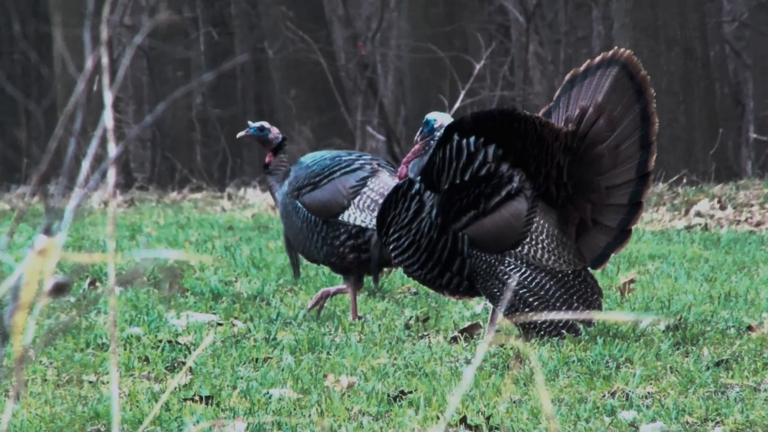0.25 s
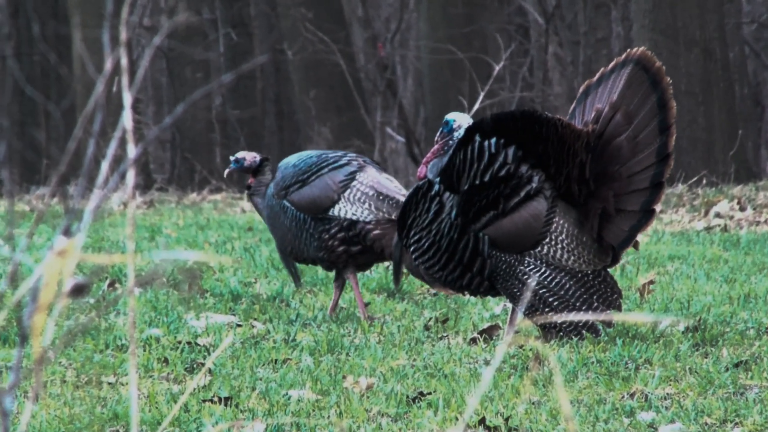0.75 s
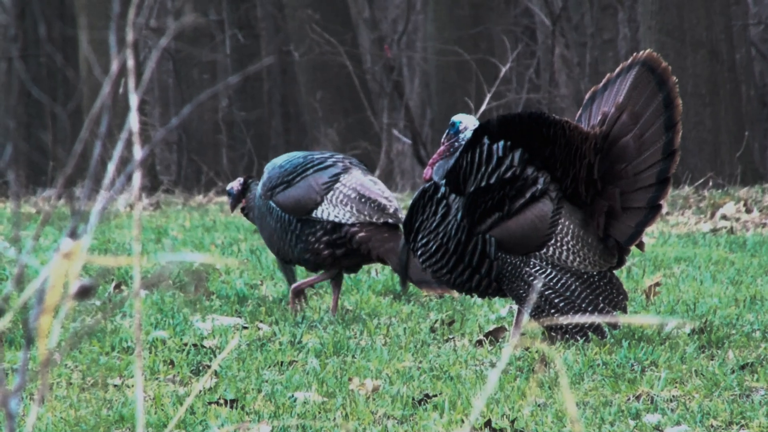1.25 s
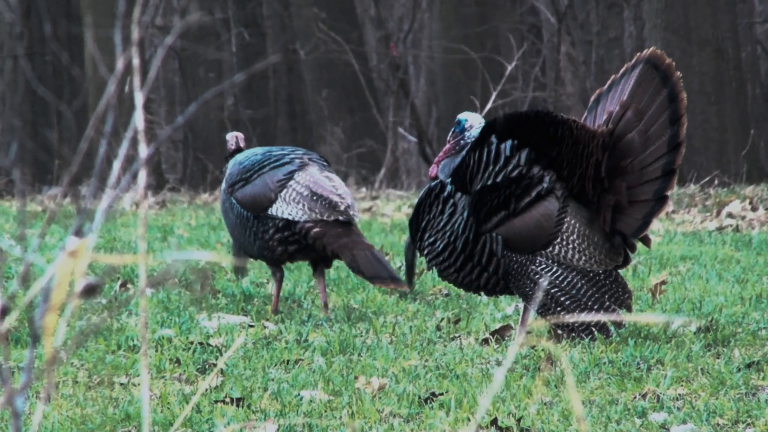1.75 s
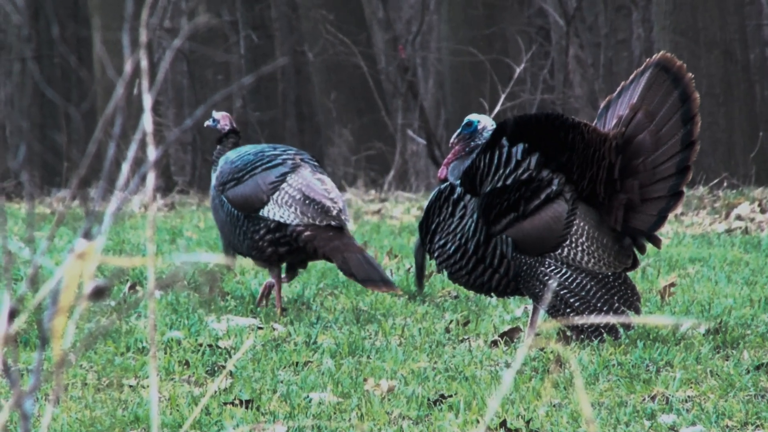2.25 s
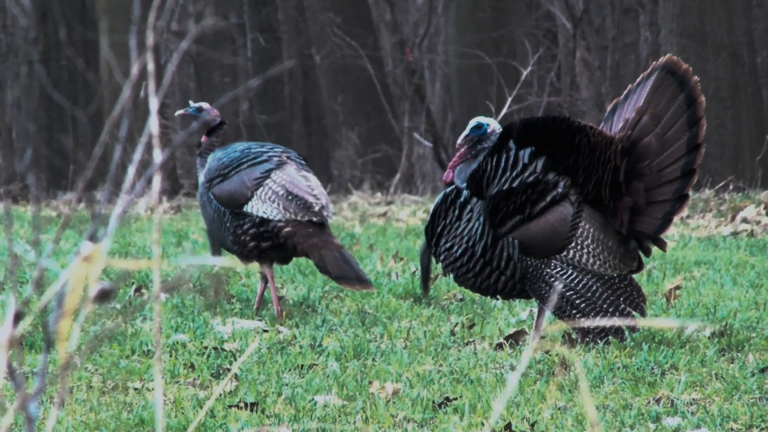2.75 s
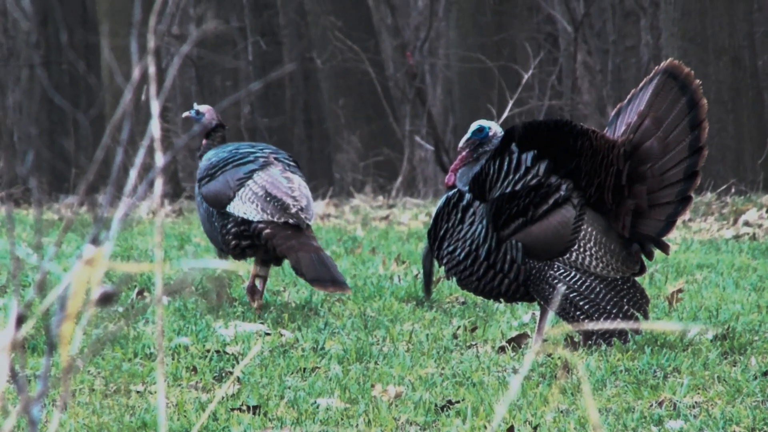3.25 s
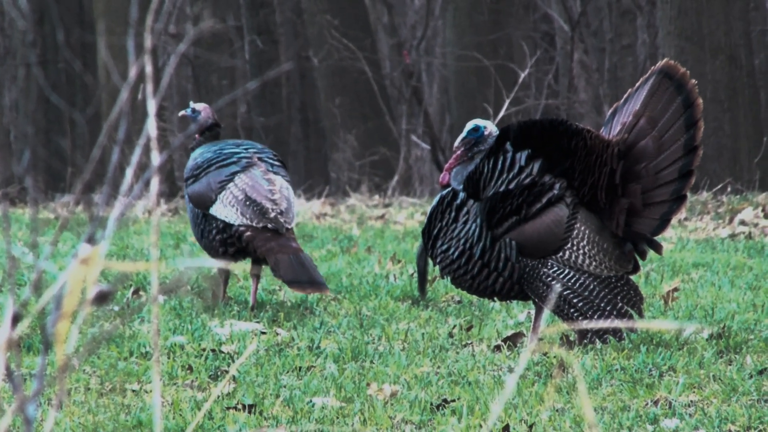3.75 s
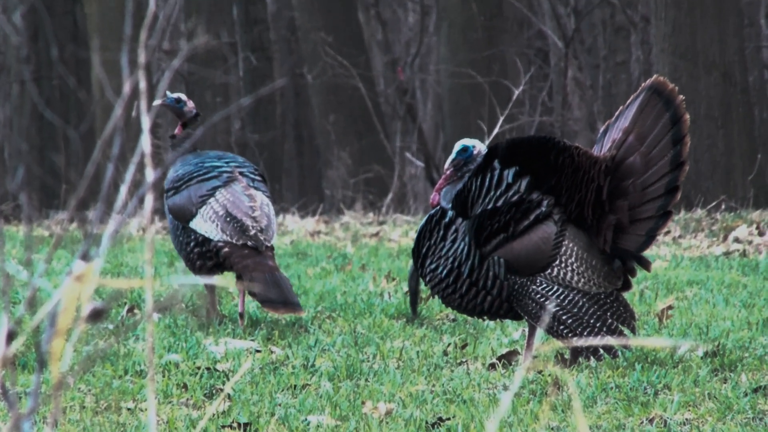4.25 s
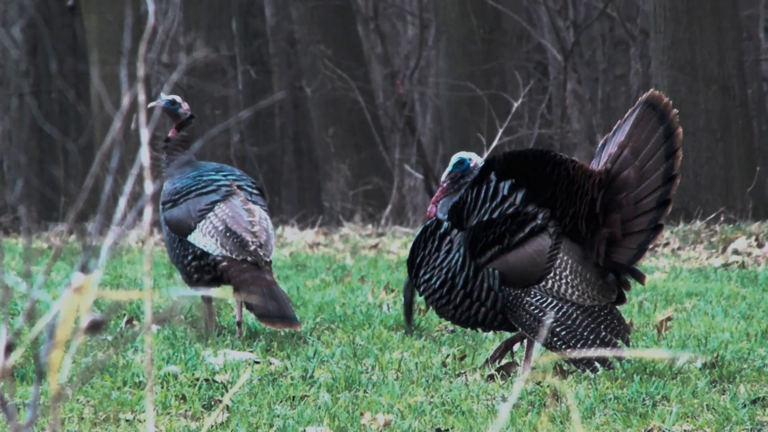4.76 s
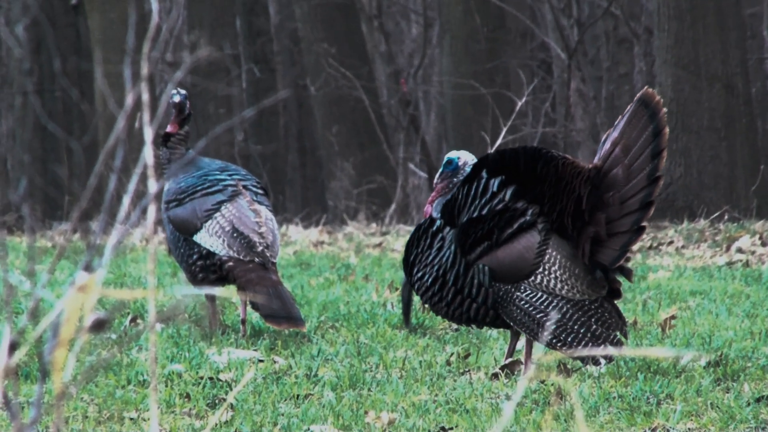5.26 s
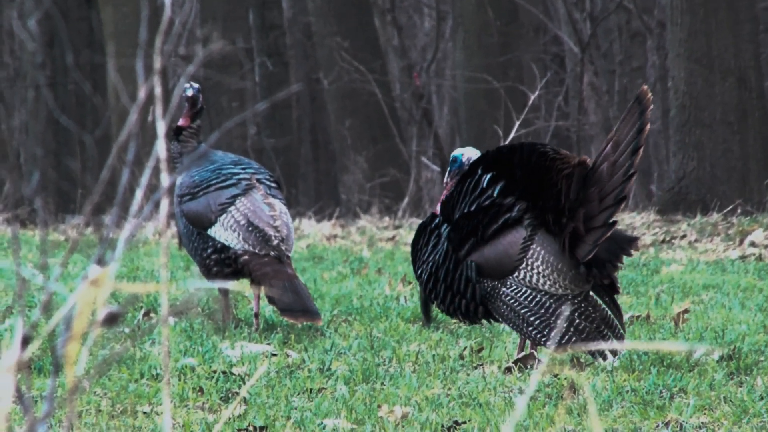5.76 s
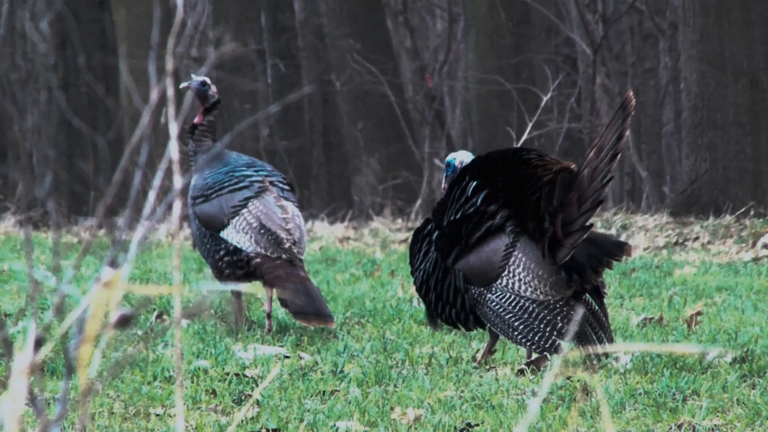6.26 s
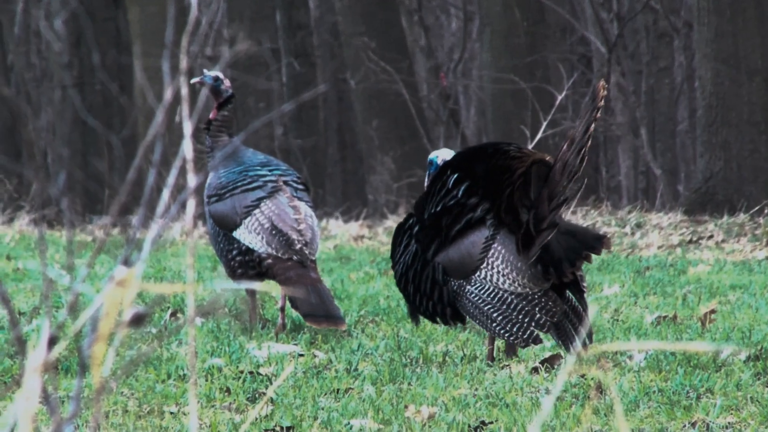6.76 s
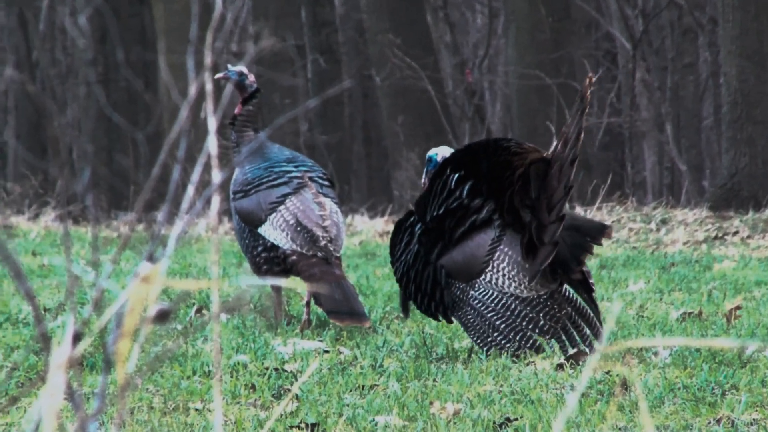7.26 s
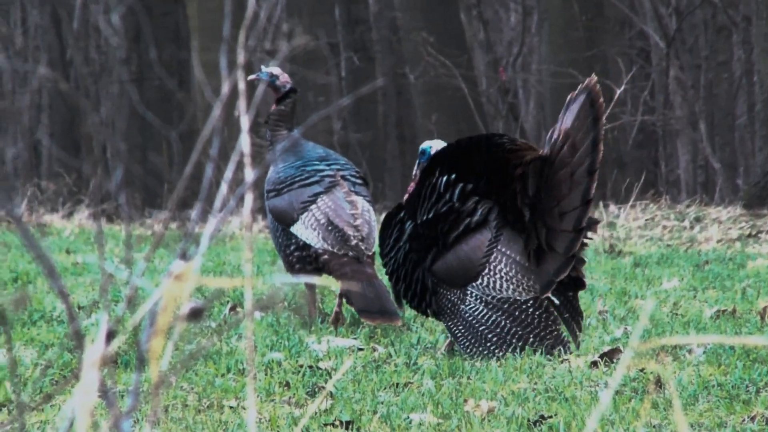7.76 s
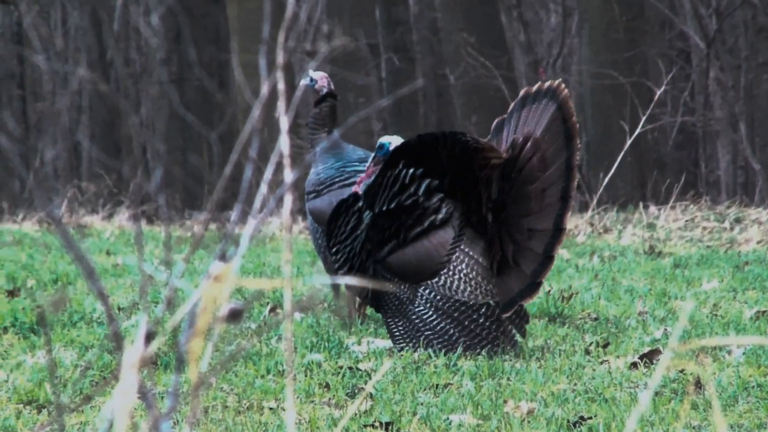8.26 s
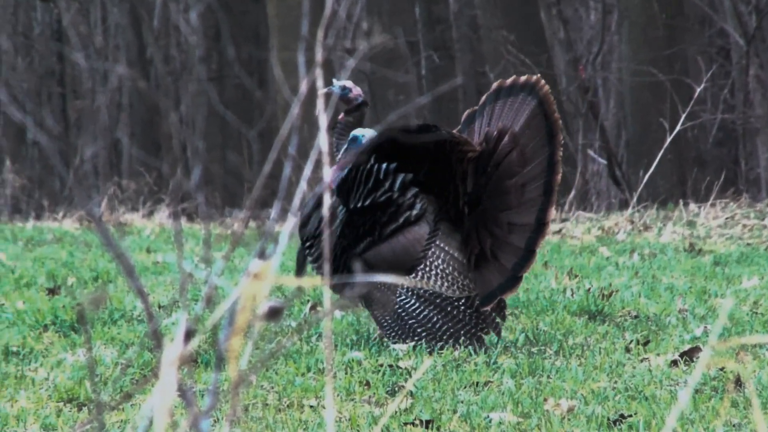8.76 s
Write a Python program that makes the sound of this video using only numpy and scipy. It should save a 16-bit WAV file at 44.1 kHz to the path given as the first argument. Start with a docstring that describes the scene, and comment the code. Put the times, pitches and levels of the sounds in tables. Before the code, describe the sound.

At a field edge beside woods, a hen turkey makes two soft peeps, then a long run of fifteen hoarse yelps, starting quietly, swelling and settling into a steady rhythm. Each flicks upward at its end and leaves a faint echo among the trees. After the last, only quiet air, a low wavering hum, small dull taps and a far songbird remain. Wide stereo, with the calls close on the left and the hum and taps on the right.

```python
"""At the edge of a field a hen turkey calls: two soft peeps, then fifteen raspy yelps that swell and even out.
Each yelp is a pulse train through moving resonances: a thin whistle, a break into rasp, an upward flick.
The woods answer faintly with slowly rising, decaying noise; a far songbird is a few gliding sine tones.
Two spaced microphones: the left faces the caller, the right favours a far hum (wavering harmonics),
a gusting breeze (coloured noise) and soft taps (decaying modes)."""
import sys
import numpy as np
from scipy import signal
from scipy.fft import rfft, irfft, next_fast_len
from scipy.io import wavfile
from scipy.ndimage import uniform_filter1d

SR = 44100
rng = np.random.default_rng(int(sys.argv[2]) if len(sys.argv) > 2 else 0)


def unload_wav(signal):
    """Save mono or channel-first audio to the path in sys.argv[1] as 16-bit WAV at rate SR, clipped to [-1, 1]."""
    wavfile.write(
        sys.argv[1],
        SR,
        np.round(np.clip(np.atleast_2d(signal).T, -1, 1) * 32767).astype(np.int16),
    )


N = 396635  # samples
EDGE_HZ = 15700  # upper band limit
TAUT_HZ = 813.2  # pitch at which the tension of the voice counts as 1


def amp(db):
    """Level to amplitude ratio: 20 dB is a factor of ten."""
    return 10 ** (np.asarray(db) / 20)


def evened(x):
    """Normalisation to unit RMS."""
    return x / np.sqrt(np.mean(x ** 2) + 1e-20)


def read(points, hz):
    """A spectrum's value by linear interpolation on a logarithmic frequency axis."""
    f, value = np.transpose(points)
    return np.interp(np.log(hz + 1), np.log(f + 1), value)


def add(mix, s, sound):
    """Superposition: a sound is summed into the mix from time s."""
    part = mix[max(round(s * SR), 0):][:len(sound)]
    part += sound[:len(part)]


def bump(x, at, width):
    """A Gaussian bell of height 1; width is its 1/e half width."""
    return np.exp(-((x - at) / width) ** 2)


def ramp(u, start):
    """Zero until start, then linear up to 1 at u = 1."""
    return np.maximum(u - start, 0) / max(1 - start, .01)


def wander(size, hz):
    """Low-pass noise of about unit RMS, rolling off above hz."""
    span = next_fast_len(size)
    f = np.fft.rfftfreq(span, 1 / SR)
    spectrum = rfft(rng.standard_normal(span)) / (1 + (f / hz) ** 4)
    return evened(irfft(spectrum, span))[:size]


def colour(x, points, size=4096):
    """Minimum-phase filter: the Hilbert transform of the log gain supplies the causal phase."""
    log_gain = np.log(amp(read(points, abs(np.fft.fftfreq(size, 1 / SR)))))
    response = np.fft.ifft(np.exp(np.conj(signal.hilbert(log_gain)))).real
    return signal.oaconvolve(x, response[:size // 2])[:len(x)]


def resonate(x, hz, width):
    """A moving resonance: shift the curve hz to zero, low-pass by one pole, shift back."""
    turn = np.exp(2j * np.pi * np.cumsum(hz) / SR)
    r = np.exp(-np.pi * width / SR)
    return 2 * (turn * signal.lfilter([1 - r], [1, -r], x / turn)).real


def brush(x, t60):
    """Early scattering from ground and nearby stems: a decaying noise response of unit energy."""
    t = np.arange(SR // 8) / SR
    response = rng.standard_normal(len(t)) * amp(-60 * t / t60) * (t > .001)
    return signal.oaconvolve(x, response / np.linalg.norm(response))[:N]


def woods(x, rise_s=0.21):
    """Multiple scattering among trunks: a slowly rising tail with frequency-dependent decay."""
    # spectrum of the answer: hz, gain_db
    answer_colour = [(300, -24.5), (800, 3), (1600, 3), (2900, -6), (3300, -12), (3700, -13.5), (5800, -7),
                     (12000, -21.5)]
    # reverberation time: hz, t60_s
    answer_t60 = [(300, 0.74), (1600, 0.78), (3000, 1.3), (6000, 0.11), (12000, 0.45)]
    hz, t, z = signal.stft(rng.standard_normal(int(1.5 * SR)), SR, nperseg=256)
    decay = amp(-60 * t / read(answer_t60, hz)[:, None])
    z = z * decay * (1 - np.exp(-t / rise_s))
    tail = evened(signal.istft(z, SR, nperseg=256)[1])
    return colour(signal.fftconvolve(x, tail / np.linalg.norm(tail))[:N], answer_colour)


def field():
    """Broadband noise: steady air, and a breeze whose amplitude is modulated by gusts."""
    # spectrum of the still air, relative: hz, density_db (per Hz)
    air_colour = [(20, -19), (76, -1), (110, -6.5), (185, -16), (260, -17), (400, -25), (1000, -28),
                  (1500, -34), (10000, -42), (15500, -46.5)]
    # balance of the air, left minus right: hz, difference_db
    air_side = [(25, -14.5), (60, -27.5), (200, -23), (400, -18.5), (1300, -5), (2400, -4), (4400, -10),
                (15000, -10.5)]
    # spectrum of the breeze, relative: hz, level_db
    breeze_colour = [(100, -23.5), (300, -1.5), (600, 0.5), (1000, -5.5), (1600, -13.5), (3000, -24.5),
                     (12000, -29.5)]
    # gusts in the grass, added to the breeze before the side gains: peak_s, half_width_s, level_db
    gusts = [(1.7, .35, -67), (5.522, .24, -61.5), (7.95, .27, -66.5), (8.98, .12, -68.5)]
    air_db, breeze_db = -60.5, -74.5  # before the side gains; breeze between gusts
    span = next_fast_len(N)
    t, hz = np.arange(N) / SR, np.fft.rfftfreq(span, 1 / SR)
    lean = amp(read(air_side, hz))
    sides = 2 * np.array([lean, np.ones(len(hz))]) / np.sqrt(1 + lean ** 2)
    air = [evened(colour(rng.standard_normal(N), air_colour, size=16384)) for _ in sides]
    air = amp(air_db) * irfft(rfft(air, span) * sides, span)[:, :N]
    breeze = np.array([evened(colour(rng.standard_normal(N), breeze_colour)) for _ in sides])
    strength = amp(breeze_db) + sum(amp(db) * bump(t, s, width) for s, width, db in gusts)
    return air + breeze * strength * amp([[-6], [5]])  # left, right dB


def hum(flicker_db=3, fourth_db=-5):
    """A harmonic series: lines 2, 3 and 4 share a wavering pitch; 2 and 3 flicker and swell."""
    # swells of single lines, before flicker and side gains: multiple, peak_s, half_width_s, level_db
    swells = [(3, .65, 0.44, -63), (3, 2.12, 0.16, -58), (2, 2.6, .2, -66.5), (2, 4.9, 0.25, -61),
              (3, 5.5, .14, -65), (3, 8.45, 0.144, -60), (2, 8.6, .45, -62.5)]
    base_hz, waver = 45.4, .014  # mean pitch; its RMS wander as a share
    rest_db = -66.5  # between swells, before flicker and side gains
    t = np.arange(N) / SR
    turn = 2 * np.pi * np.cumsum(base_hz * (1 + waver * wander(N, hz=4.3))) / SR
    out = amp(rest_db + fourth_db) * np.sin(2 * 2 * turn)
    for k in (2, 3):
        level = amp(rest_db) + sum(amp(db) * bump(t, s, width) for line, s, width, db in swells if line == k)
        out += level * amp(flicker_db * wander(N, hz=4)) * np.sin(k * turn)
    return out * amp([[-18], [7]])  # left, right dB


def whistles(rows, overtone_db, settle, count):
    """Frequency glides: phase integrates a pitch settling on its last value; overtones are weaker."""
    out = np.zeros(N)
    for s, length, db, first_hz, last_hz in rows:
        u = np.linspace(0, 1, int(length * SR))
        hz = last_hz + (first_hz - last_hz) * (1 - u) ** settle
        turn = 2 * np.pi * np.cumsum(hz) / SR
        tone = sum(amp(overtone_db * np.sqrt(k)) * np.sin((k + 1) * turn) for k in range(count))
        add(out, s, amp(db) * evened(tone * np.sin(np.pi * u)))
    return out


def songbird():
    """A small bird far off among the trees: pure gliding tones and their scattered answer."""
    # song notes, level before the side gain: start_s, length_s, level_db, first_hz, last_hz
    notes = [(.66, 0.4, -79.5, 2700, 2145), (.66, 0.099, -81, 2850, 2990), (7.83, 0.065, -69.5, 2650, 2770),
             (7.88, 0.11, -75.5, 2650, 2100), (8.04, .068, -74, 2520, 2300), (8.46, .1, -67.5, 3050, 2625),
             (8.55, 0.17, -84, 2780, 2740), (8.92, 0.08, -72.5, 2650, 2980)]
    song = whistles(notes, overtone_db=-30, settle=3.2, count=1)
    return np.array([song * amp(-3), song]) + amp(-12) * woods(song)


def gesture(t, length, tension, rasp):
    """Articulation of a yelp: pitch factor, level dB, rasp and throat resonance Hz follow its course."""
    # places and widths are shares of the length u unless named _s
    u = t / length
    haste = tension ** 2.4  # a slack, low voice takes longer to start and to settle after the break
    # pitch: a shallow arch, then the upward flick
    flick = ramp(u, .77)
    bend = 1 - .45 * (u - .42) ** 2 + flick ** 2
    # level: quick attack, hold, steady sag, a brief catch as the throat shuts, release
    attack_db, attack_s = 27, .017  # time at tension 1
    sag_db, catch_db, release_db = 13, 6, 15
    level_db = -attack_db * np.maximum(1 - haste * t / attack_s, 0) - sag_db * ramp(u, 0.32)
    level_db = level_db - catch_db * bump(u, 0.7, 0.026) - release_db * ramp(u, 0.81)
    # rasp: a base that leaves the flick clean, a burst as the throat shuts, another as the voice breaks
    lasting = 0.48 * np.exp(-6 * flick) + 0.57 * bump(u, .72, 0.074)
    breaking = rasp * 0.51 * bump(haste * u, .19, .12)
    rough = breaking + lasting * tension ** 5.5  # a taut voice stays raspy until the clean upward flick
    # the throat opens slowly, closes faster; a taut voice raises its resonance
    shut_hz, open_hz = 900, 2850  # at tension 1
    mouth = bump(u, 0.43, np.where(u < 0.43, 0.71, 0.36))
    opening_hz = (shut_hz + (open_hz - shut_hz) * mouth) * tension ** 0.98
    return bend, level_db, rough, opening_hz


def windpipe(treble_db):
    """Formants: the powers of the resonances add, with treble_db per octave of tilt above 3 kHz."""
    # resonances of windpipe and beak: centre_hz, width_hz (between -6 dB points), peak_db (before tilt)
    resonances = [(478.3, 110, -5.5), (802, 100, 8), (1296, 250, 6), (1399, 260, 4), (1679, 220, 8),
                  (2110, 320, 4.5), (2462, 860, -4.5), (2818, 470, 2.5), (3255, 260, -1), (3730, 440, -6.5),
                  (4293, 370, 0), (4600, 170, -9.5), (5693, 630, 2.5), (7070, 1500, -10.5),
                  (8396, 1100, -8), (10000, 3000, -12.5), (13000, 3000, -34)]
    hz = np.geomspace(30, SR / 2, 500)
    power = sum(amp(db) ** 2 / (1 + (2 * (hz - f) / width) ** 2) ** 2 for f, width, db in resonances)
    tilt = treble_db * np.log2(np.maximum(hz / 3000, 1))
    return np.transpose([hz, 10 * np.log10(power) + tilt])


def yelp(row, chance, jitter=0.05, flutter=0.55, flutter_drift=.03, flutter_sink=.35, second_db=-4, hiss=1.0,
         throat_width=1500, leak=0.057, whistle_hz=1120, whistle_db=-19, whistle_s=0.009):
    """Source and filter: membrane pulses, modulated by a higher flutter, pass a throat that opens and shuts."""
    s, length, db, pitch_hz, rasp = row
    tension = pitch_hz / TAUT_HZ
    # calls pushed above easy_db fade faster and have less fundamental; louder is brighter
    easy_db, flutter_hz, rattle_db = -10, 1201.4, 2  # flutter pitch at tension 1 and bend 1
    push_db = max(db - easy_db, 0)
    fade_db, fundamental_db = 0.73 * push_db, -13.5 - 3.3 * push_db
    treble_db = 0.16 * (db - easy_db)
    t = np.arange(int(length * SR)) / SR
    slip, drift, rattle, air = chance[:, int(s * SR):][:, :len(t)]
    bend, level_db, rough, opening_hz = gesture(t, length, tension, rasp)
    hz = pitch_hz * bend * (1 + jitter * rough * slip)
    turn = 2 * np.pi * np.cumsum(hz) / SR
    # quadratic phases spread each pulse over its cycle: a buzz without sharp clicks
    harmonics = np.arange(22) + 1
    pulses = evened(sum(np.cos(k * turn + k * k * np.pi / 7) * (k * hz < EDGE_HZ) for k in harmonics))
    # the flutter, near one and a half times the pitch, puts fuzzy lines between the harmonics
    sink = 1 - flutter_sink * ramp(t / length, 0.42)  # it sinks as the throat shuts
    second_hz = flutter_hz * tension ** .3 * bend * sink * (1 + flutter_drift * drift)
    second = np.cos(2 * np.pi * np.cumsum(second_hz) / SR)
    drive = pulses * (1 + 2 * flutter * rough * second) + rough * (hiss * air + amp(second_db) * second)
    voice = resonate(resonate(drive, opening_hz, throat_width), opening_hz, throat_width)
    # some drive leaks past the throat; harder blowing lets more treble out
    voice = colour(voice + leak * amp(.7 * level_db) * drive, windpipe(treble_db))
    voice /= np.sqrt(uniform_filter1d(voice ** 2, size=260) + 1e-12)  # flatten the level over 6 ms
    # the rasp shakes the loudness
    voice_db = level_db - fade_db * (t / length + 0.38) + rattle_db * (rough * rattle - 0.53)
    # the membrane's own swing fades more slowly than the rest of the voice
    swing_db = fundamental_db + 0.35 * level_db - 3.4 * rough
    fundamental = np.sqrt(2) * amp(swing_db) * np.sin(turn)
    # a thin whistle sounds just before the voice breaks
    pure = 2 * np.pi * np.cumsum(whistle_hz * tension ** .4 * (1 - 4 * (t - .005))) / SR
    whistle = (np.sin(pure) + 0.45 * np.sin(2 * pure)) * np.sin(np.pi * np.minimum(t / whistle_s, 1))
    whistle *= amp(whistle_db - .5 * (db - easy_db))
    sound = voice * amp(voice_db) + fundamental + whistle
    return s, amp(db) * sound * signal.windows.tukey(len(t), .04)


def turkey():
    """Propagation: direct voice, reaching the right microphone 2 ms earlier, and scatter from grass and woods."""
    # soft opening peeps, level before flicker: start_s, length_s, level_db, first_hz, last_hz
    peep_rows = [(.93, .036, -51, 1155, 1040), (.976, 0.044, -47, 920, 1060)]
    # yelps: start_s, length_s, level_db (before envelope), pitch_hz (top of the arch, before jitter),
    # rasp (factor on the burst at the break)
    yelp_rows = [(1.285, 0.091, -26.5, 675, 0.6), (1.603, .122, -16.5, 699.4, 2.15),
                 (1.907, 0.12, -14, 731.7, 1.9), (2.189, .13, -11.5, 774, 1.2), (2.46, .12, -12, 802, 1.1),
                 (2.727, .14, -10.5, 813.3, 0.58), (3.008, 0.14, -7.5, 825, 1.04),
                 (3.281, .14, -8, 836.7, 0.59), (3.553, .13, -5.5, 828.3, 0.95),
                 (3.821, 0.14, -5, 825, 1.32), (4.109, 0.14, -9.5, 831, 0.52),
                 (4.421, .14, -7.5, 824.8, 0.65), (4.735, .14, -11, 826, 0.54),
                 (5.058, 0.14, -11, 823.5, 1.38), (5.465, .12, -5.5, 814.3, 0.98)]
    # colour of the path to the right microphone: hz, gain_db
    far_path = [(200, -8), (500, -1.5), (780, -8), (1170, -13), (1790, -16), (2740, -15), (4190, -21.5),
                (6400, -6.5), (10000, -10), (15000, -7.5)]
    # shared chance: pitch slip, flutter drift, rattle, breath noise
    chance = np.array([wander(N, hz=328.7), wander(N, hz=157), wander(N, hz=120), rng.standard_normal(N)])
    voice = whistles(peep_rows, overtone_db=-14.5, settle=1.14, count=4) * (1 + 0.2 * wander(N, hz=900))
    for row in yelp_rows:
        add(voice, *yelp(row, chance))
    lead, brush_db, brush_t60 = 92, -13, .07  # samples; left scatter dB; s
    left = voice + amp(brush_db) * brush(voice, t60=brush_t60)
    right = colour(np.roll(voice, -lead) + brush(voice, t60=brush_t60), far_path)
    return np.array([left + amp(-42.5) * woods(voice), right + amp(-42.0) * woods(voice)])


def taps(tick_db=-17, tick_t60=0.0055):
    """Modal ringing: small dull knocks by the right microphone excite damped modes and a noise tick."""
    # taps, peak before the side gain: start_s, peak_db, brightness_db (per octave about 400 Hz; gain of the tick)
    tap_rows = [(1.92, -31, 2.5), (4.007, -38, 4), (4.378, -38, -3.5), (4.942, -39, -5), (5.811, -34.5, 0),
                (5.893, -41.5, 2.5), (6.77, -39, -2.5), (6.858, -42, 0.5), (7.175, -40.5, -4.5),
                (8.393, -41.5, -2.5), (8.453, -34.5, -0.5), (8.761, -46, 1), (8.859, -35.5, -0.5)]
    # modes, pitch and level before each tap's chance and brightness: hz, level_db, t60_s
    modes = [(215, 0, .055), (275, 0, .04), (370, -2, .025), (520, 0, .025), (640, -4, .02),
             (900, -6, .015), (1350, -6, .015)]
    out, t = np.zeros(N), np.arange(SR // 8) / SR
    for s, db, bright_db in tap_rows:
        ring = np.zeros(len(t))
        for hz, level, t60 in modes:
            mode_db = level + bright_db * np.log2(hz / 400) - 60 * t / t60
            ring += amp(mode_db) * np.sin(2 * np.pi * hz * rng.uniform(0.62, 1.2) * t)
        tick = amp(tick_db + bright_db - 60 * t / tick_t60) * rng.standard_normal(len(t))
        add(out, s, amp(db) * (ring + tick) / abs(ring + tick).max())
    return np.array([amp(-15.5) * brush(out, t60=0.054), amp(8) * out])


def scene():
    """Linear superposition of all sources at the two microphones."""
    return field() + hum() + songbird() + turkey() + taps()


def record(dry, bend=0.049):
    """Nonlinear distortion: a lopsided square-law bend and clipping at full scale, then the band limit."""
    loud = np.clip(dry + bend * dry ** 2, -1, 1)
    low_pass = signal.firwin(511, EDGE_HZ, window=("kaiser", 9), fs=SR)
    return signal.oaconvolve(loud, low_pass[None], "same")


dry = scene()
out = record(dry)
unload_wav(out)
```